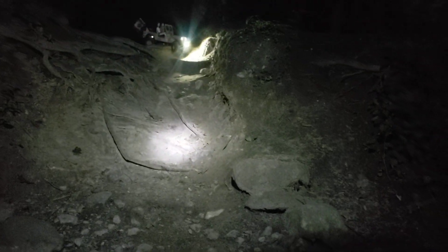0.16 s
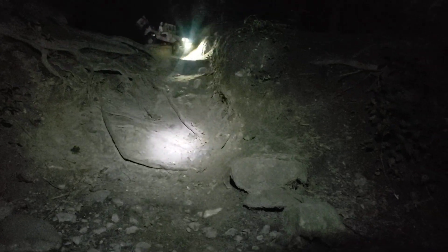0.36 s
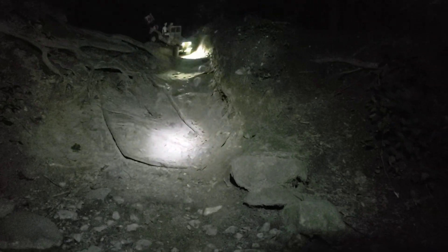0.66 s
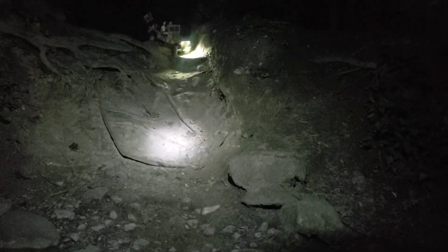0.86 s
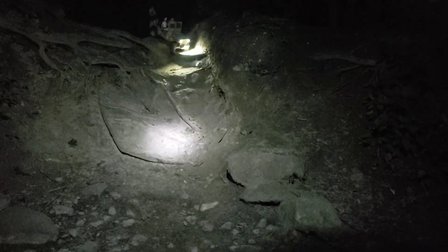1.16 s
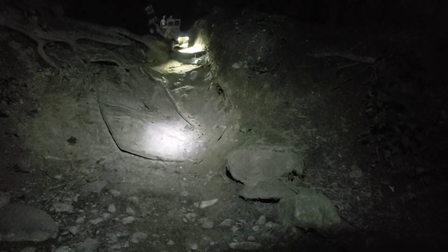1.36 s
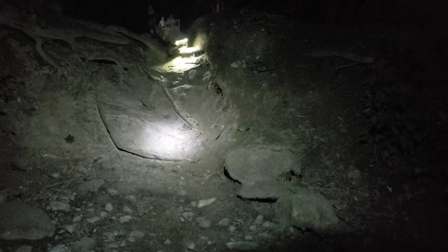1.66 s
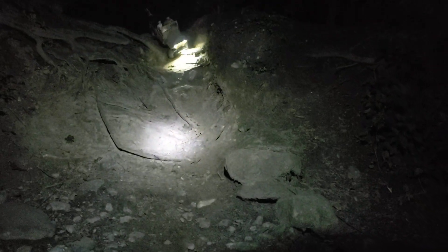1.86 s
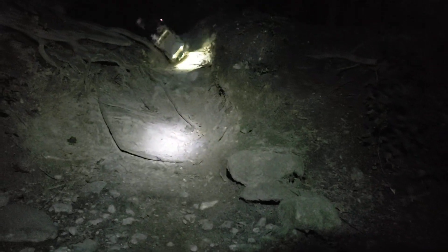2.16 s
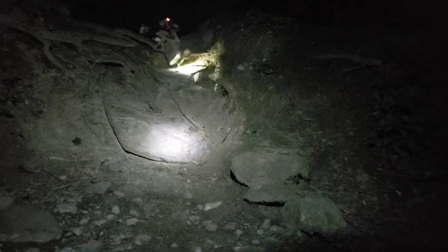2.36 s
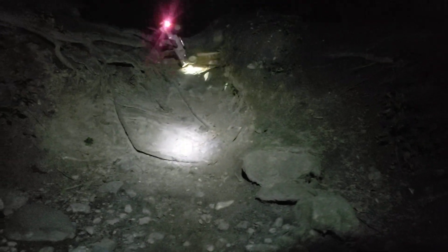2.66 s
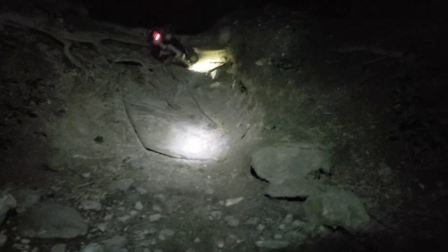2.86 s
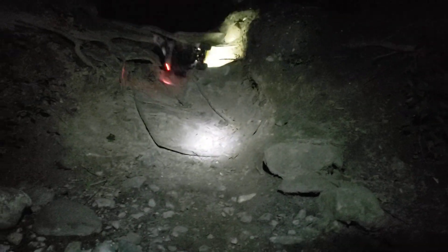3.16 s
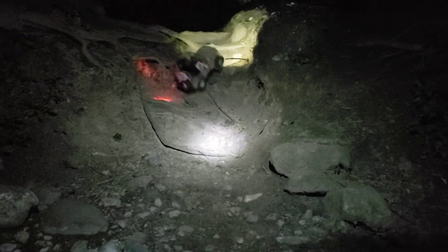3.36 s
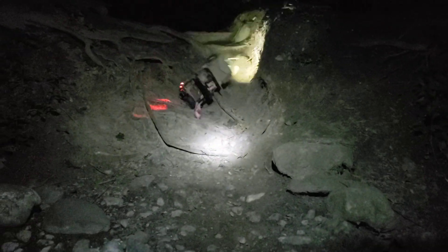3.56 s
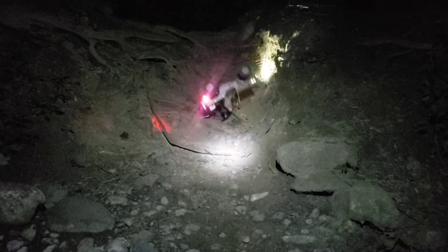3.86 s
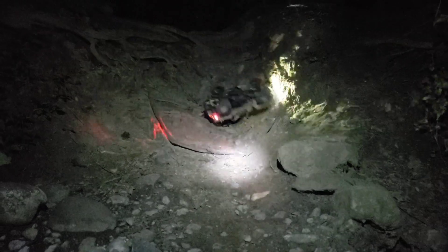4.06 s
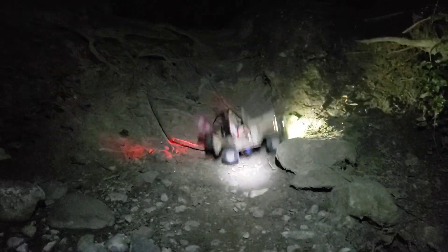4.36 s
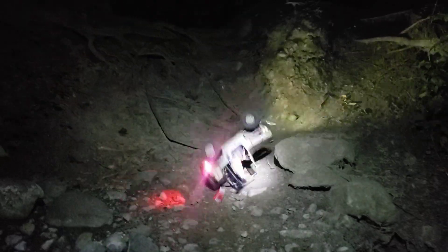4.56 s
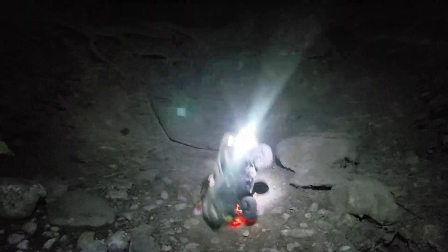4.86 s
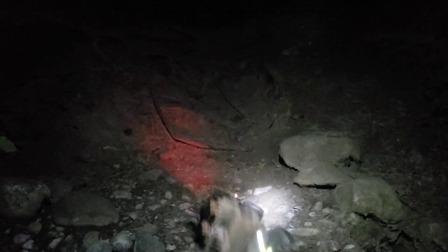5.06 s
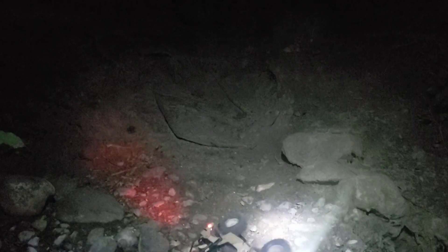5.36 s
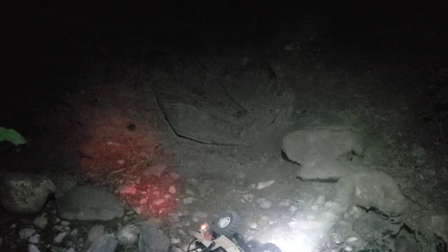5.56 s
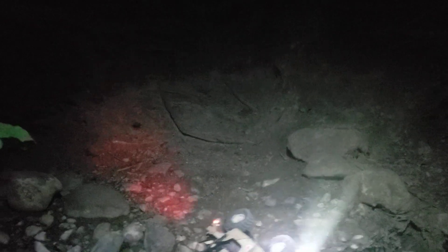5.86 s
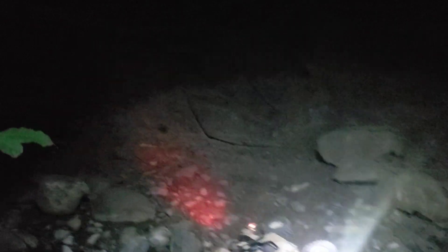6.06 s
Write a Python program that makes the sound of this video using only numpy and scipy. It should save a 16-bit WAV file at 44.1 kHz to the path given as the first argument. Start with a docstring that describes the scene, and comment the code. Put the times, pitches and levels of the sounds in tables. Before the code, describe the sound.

Nylon sleeve swishes over faint insects, then a small hard-shelled model vehicle tumbles down stone with hollow clacks, rubbery thumps and gritty scrapes.

```python
"""A radio-controlled model truck slips on a rock face and tumbles onto gravel near the microphone, at night in a wood.
Damped resonances make its tyres thump and its plastic shell knock and rattle; gliding tones make it judder.
Each slide drags grit along: showers of tiny noise bursts under levels that bite, fade and let go.
Before the fall a nylon sleeve swishes close by, as thread noise and whistles that follow the speed of each stroke.
Behind it all, narrow bands of pulsing noise trill as insects over a low, distant rumble."""
import sys
import numpy as np
from scipy import signal
from scipy.fft import rfft, irfft, next_fast_len
from scipy.io import wavfile

SR = 44100
rng = np.random.default_rng(int(sys.argv[2]) if len(sys.argv) > 2 else 0)


def wav_record(signal):
    """Record a signal, one row per channel, as 16-bit PCM in the file named by sys.argv[1]."""
    frames = np.transpose(np.atleast_2d(signal))
    bounded = np.clip(frames, -1, 1)
    # unit amplitude maps onto the largest positive 16-bit level
    quanta = np.round(bounded * 32767).astype(np.int16)
    wavfile.write(sys.argv[1], SR, quanta)


N = 274301  # length of the scene in samples

# Distant rumble of the night. Each row: frequency in Hz, density in dB per Hz.
NIGHT_SPECTRUM = [(20, -26), (40, -14), (60, -2), (80, -0.5), (118, -2), (160, -12), (250, -18.5),
                  (400, -33.5), (800, -41.5), (1600, -50), (3800, -55), (8500, -61.5), (12000, -56.5),
                  (16000, -57)]
NIGHT_DB = -48.5  # before its slow wander
# Insect choruses. Each row: centre in Hz, width in Hz, level in dB, mean pulse rate per second.
INSECTS = [(2370, 270, -80.5, 33), (4550, 180, -86, 47), (5080, 630, -74.5, 59)]

# Strokes of nylon on nylon. Each row: middle in seconds, half length in seconds, top rate of threads in Hz,
# hiss in dB, hollow rustle in dB, treble in dB.
STROKES = [(0.144, 0.076, 6470, -51.5, -51.5, -49.5), (0.461, 0.074, 4870, -53, -53.5, -52),
           (1.051, 0.054, 3490, -65.5, -55, -63), (1.467, 0.043, 3500, -77, -63.5, -82),
           (1.735, 0.033, 3410, -65.5, -57, -72), (1.827, 0.062, 2200, -74, -61, -98)]
# Hiss of the threads, hollow rustle and treble sheen. Each row: frequency in Hz, density in dB per Hz.
NYLON_SPECTRUM = [(900, -3), (1500, -6), (2500, -1.5), (3200, -0.5), (4000, -4.5), (5500, -5), (6800, -4),
                  (9000, -19)]
HOLLOW_SPECTRUM = [(100, -32), (230, 10), (450, -14), (720, 3.5), (870, -5), (1100, -20), (2000, -32)]
SHEEN_SPECTRUM = [(4500, -34), (7500, -3.5), (11000, 0), (13000, -1), (14400, 2), (16000, -8)]
# Resonances of the folds of cloth. Each row: frequency in Hz, width in Hz, gain in dB.
FOLD_MODES = [(3260, 290, 7.5), (4800, 440, 0.5), (6800, 360, 4.5), (11200, 600, -4), (14400, 530, -5)]

# Skids of the truck over grit. Each row: start in seconds, length in seconds, scrape in dB,
# tyre rumble in dB, fine sand in dB.
SKIDS = [(2.244, 0.14, -46.5, -49, -57.5), (2.552, 0.13, -49.5, -52.5, -57.5),
         (2.981, 0.076, -42, -45, -47.5), (3.1, 0.09, -48, -52, -48.5), (3.218, 0.1, -41, -44.5, -56),
         (3.314, 0.14, -41, -47, -46.5), (3.466, 0.068, -50.5, -53, -67), (3.564, 0.067, -40, -44.5, -45),
         (3.65, 0.1, -51, -49.5, -58.5), (3.796, 0.22, -38.5, -40, -44.5), (4.012, 0.15, -42.5, -59.5, -49),
         (4.246, 0.056, -33, -42.5, -41.5), (4.334, 0.043, -33.5, -39, -39),
         (4.487, 0.25, -40, -47.5, -45.5), (4.783, 0.1, -38.5, -44.5, -51), (5.013, 0.16, -48, -58.5, -55),
         (5.158, 0.08, -40.5, -42.5, -46), (5.208, 0.087, -36.5, -48, -42),
         (5.319, 0.068, -32.5, -38, -38.5), (5.404, .10, -40, -44, -46.5),
         (5.533, 0.042, -57, -49.5, -55.5), (5.784, 0.053, -47, -51.5, -54.5),
         (5.914, 0.2, -58, -51.5, -60), (6.11, .07, -48, -52.5, -56)]
# A skid bites at once, fades as friction slows the truck, and lets go.
BITE_S, SLOWING_DB_PER_S, RELEASE_S = 0.005, 25.5, 0.022
# Grit that was kicked loose trickles on after it.
TRICKLE_DB, TRICKLE_S = -6, 0.09
# Coarse scrape, drumming tyres and bright stone or sand. Each row: frequency in Hz, density in dB per Hz.
SCRAPE_SPECTRUM = [(250, -15), (480, -20), (620, 0), (760, 4.5), (1100, -5.5), (1500, -2), (2200, -3.5),
                   (2900, -20), (4200, -36.5)]
RUMBLE_SPECTRUM = [(50, -19.5), (120, -6), (230, 1), (320, -3), (450, -22.5), (800, -38)]
STONE_SPECTRUM = [(1500, -0.5), (2900, -1.5), (5000, -3), (6600, -5), (8300, -14.5), (10000, -14),
                  (11000, -13), (12400, -6.5), (14000, -15.5), (16000, -18)]

# Small hard parts on pebbles. Each row: start in seconds, decay of the exciting noise in seconds,
# pitch in Hz, width in Hz, level in dB.
CLINKS = [(5.154, .007, 15200, 890, -49), (5.427, 0.0018, 13300, 3440, -31)]
# Plastic and rubber juddering on stone. Each row: start in seconds, length in seconds, start pitch in Hz,
# end pitch in Hz, level in dB.
JUDDERS = [(3.230, 0.056, 819, 775, -35.5), (4.096, 0.019, 1610, 1550, -37), (4.251, 0.022, 855, 808, -31),
           (4.370, 0.0163, 1406, 1474, -28), (5.022, 0.01, 1380, 1220, -39), (5.423, 0.015, 774, 756, -32),
           (5.800, 0.028, 556, 520, -44.5), (5.930, 0.14, 1540, 1460, -66)]

# Tyre landings. Each row: start in seconds, thump in dB.
LANDINGS = [(2.258, -42.5), (2.595, -41.5), (2.985, -40), (3.006, -43), (3.133, -42.5), (3.23, -35),
            (3.242, -40.5), (3.327, -38.5), (3.402, -34.5), (3.585, -36.5), (3.803, -28.5), (3.816, -34),
            (4.281, -37.5), (4.341, -26), (4.666, -32), (5.330, -27)]
# Tyre resonances at a middling landing. Each row: frequency in Hz, width in Hz, gain in dB.
TYRE_MODES = [(158.4, 67, -4), (236.2, 31.7, 6.5), (300, 48.5, 3.5)]
# Rubber stiffens when squashed: above a middling landing its pitch rises.
MIDDLING_DB, STIFFEN_OCTAVES_PER_DB = -32.5, 0.03

# Blows of the shell on rock. Each row: start in seconds, knock in dB, crack in dB,
# centre of the knock in Hz, contact time in seconds.
KNOCKS = [(2.258, -49, -51, 784, 0.0089), (2.499, -67, -59.5, 1860, 0.025),
          (2.572, -51.5, -65, 1040, .0033), (3.006, -46, -59, 930, 0.018), (3.104, -48.5, -53, 1110, .003),
          (3.133, -40, -38, 1680, 0.0045), (3.229, -40.5, -68, 750, 0.0032),
          (3.243, -39.5, -53.5, 805, 0.036), (3.324, -46.5, -55, 840, .005),
          (3.366, -38.5, -49.5, 800, .011), (3.403, -43, -51, 796, 0.024), (3.586, -37, -43.5, 1070, 0.034),
          (3.802, -29, -37, 1360, .0056), (3.815, -36, -39.5, 1500, 0.01), (3.868, -45, -45, 1550, 0.013),
          (4.058, -50, -53, 1850, .004), (4.146, -48, -48, 2100, .004), (4.235, -45, -45, 930, 0.009),
          (4.251, -53, -41.5, 820, 0.0016), (4.281, -42, -43, 845, 0.006),
          (4.370, -37.5, -49, 1320, 0.0092), (4.378, -32.5, -38, 1420, 0.0067),
          (4.506, -40.5, -46, 1080, 0.0043), (4.608, -37.5, -49, 840, 0.0026),
          (4.671, -35, -47.5, 1470, 0.0084), (4.797, -34.5, -36.5, 1570, 0.0028),
          (4.818, -61, -40.5, 1330, 0.009), (4.847, -42.5, -42, 1140, 0.0018),
          (5.009, -49, -54.5, 1330, 0.0046), (5.040, -28.5, -39.5, 1090, 0.0064),
          (5.105, -55, -53, 1300, .0027), (5.214, -37.5, -51, 920, 0.0034),
          (5.228, -30.5, -42.5, 790, 0.0085), (5.259, -41, -38, 910, 0.0034),
          (5.331, -33.5, -39, 1160, 0.01), (5.417, -32.5, -37.5, 1020, 0.0083),
          (5.425, -34, -30.5, 815, 0.012), (5.802, -41, -56, 1100, .025),
          (5.932, -51.5, -55.5, 1490, 0.014), (6.152, -45, -68, 890, .006)]
# Shell resonances before each blow favours some. Each row: frequency in Hz, width in Hz, gain in dB.
SHELL_MODES = [(555, 25.5, -10), (787, 108, -3), (968, 150, -6.5), (1240, 130, -7), (1498, 99, -3.5),
               (1995, 105, -7), (2168, 71, -1.5), (2710, 204, -7.5)]

# Width between the two microphone ports. Each row: frequency in Hz, side gain in dB.
SPREAD = [(100, -20), (250, -13), (700, -10.5), (1300, -7.5), (2400, -4.5), (4400, -1.5), (8000, 0.5),
          (15000, 0)]
# Balance of the two ports. Each row: frequency in Hz, left minus right gain in dB.
LEAN = [(250, 0.5), (700, 3), (1300, 1.5), (2400, 3.5), (4400, 5.5), (8000, 0), (15000, 0)]
TOP_HZ = 16100  # upper edge of the recorder


def amp(db):
    """Decibels to gain."""
    return 10 ** (np.asarray(db) / 20)


def unit(x):
    """Scale to an rms of one."""
    return x / np.sqrt(np.mean(x ** 2) + 1e-20)


def burst(x):
    """Scale each row of a short sound to the energy of 20 ms at an rms of one."""
    energy = np.sum(x ** 2, axis=1, keepdims=True)
    return x / np.sqrt(energy / (0.02 * SR))


def noise(size):
    """Two unrelated noises: mid, which the ports share, and side, which differs between them."""
    return rng.standard_normal((2, size))


def filtered(x, response):
    """Apply a response given as a function of frequency."""
    size = next_fast_len(x.shape[-1] + 2048)
    hz = np.maximum(np.arange(size // 2 + 1) * SR / size, 1)
    return irfft(rfft(x, size) * response(hz), size)[..., :x.shape[-1]]


def colour(x, spectrum):
    """Shape by (Hz, dB) points, joined along a logarithmic frequency axis."""
    points, db = np.transpose(spectrum)
    return filtered(x, lambda hz: amp(np.interp(np.log(hz), np.log(points), db)))


def ring(x, modes):
    """Pass through damped resonances of alternating sign."""
    def response(hz):
        total = 0
        for k, (f, width, db) in enumerate(modes):
            detuning = (hz / f - f / hz) * f / width
            total = total + (-1) ** k * amp(db) / (1 + 1j * detuning)
        return total
    return filtered(x, response)


def walk(rate, size=N):
    """Random wander with a spread near one, in straight lines between `rate` new values per second."""
    t = np.arange(size) / SR * rate
    count = int(t[-1]) + 2
    return 1.2 * np.interp(t, np.arange(count), rng.standard_normal(count))


def grains(rate, scatter_db, decay_s, size=N):
    """Randomly timed tiny contacts of uneven strength, each a quickly dying burst."""
    strength = amp(scatter_db * np.minimum(rng.exponential(size=size), 4))
    energy = (rng.random(size) < rate / SR) * strength ** 2
    ringing_energy = signal.lfilter([1], [1, -np.exp(-2 / (decay_s * SR))], energy)
    return noise(size) * np.sqrt(ringing_energy)


def add(out, s, x):
    """Mix a short sound in at time s."""
    i = max(int(s * SR), 0)
    out[:, i:i + x.shape[1]] += x[:, :N - i]


def night():
    """A low distant rumble and many far insects blending into narrow trilling bands."""
    out = amp(NIGHT_DB) * unit(colour(noise(N), NIGHT_SPECTRUM)) * amp(0.82 * walk(7.5))
    for hz, width, db, rate in INSECTS:
        chorus = filtered(noise(N), lambda f: 1 / (1 + np.abs(2 * (f - hz) / width) ** 1.66))
        wavering_rate = rate * (1 + 0.11 * walk(2.2))
        pulse = 1 + 0.07 * np.sin(2 * np.pi * np.cumsum(wavering_rate) / SR)
        out = out + amp(db + 0.27 * walk(1.75)) * unit(chorus * pulse)
    return out


def trees(x, t60_s=0.42, wet_db=-19):
    """Trunks and the bank scatter a weak tail, strongest around 4 kHz."""
    t = np.arange(SR // 2) / SR
    scatter = colour(noise(len(t)), [(100, 3.5), (800, -3.0), (4000, 16.5), (15000, -10)])
    tail = scatter * amp(-60 * t / t60_s) * (1 - np.exp(-t / 0.0018))
    tail = tail / np.sqrt(np.sum(tail ** 2) / 2)
    return x + amp(wet_db) * signal.fftconvolve(x, tail, axes=1)[:, :N]


def thread_noise(spectrum):
    """A dense shower of tiny thread slips, coloured by the cloth."""
    return unit(colour(grains(rate=7000, scatter_db=5.5, decay_s=0.0048), spectrum))


def sleeve(whistle_db=-2, jitter=0.0498, snag=0.09):
    """Threads slip in a hiss that swells and brightens with speed; the weave whistles through the folds."""
    t, out, weave = np.arange(N) / SR, 0, 0
    hiss, hollow, sheen = (thread_noise(c) for c in (NYLON_SPECTRUM, HOLLOW_SPECTRUM, SHEEN_SPECTRUM))
    for s, half_s, top_hz, hiss_db, hollow_db, treble_db in STROKES:
        speed = 1 / (1 + np.abs((t - s) / half_s) ** 3)  # 1 at the middle of the stroke
        out = out + amp(hiss_db) * speed ** 0.98 * hiss
        out = out + amp(hollow_db) * speed ** 1.17 * hollow
        out = out + amp(treble_db) * speed ** 1.17 * sheen
        # threads crossed at different angles give several whistles that rise and fall together,
        # each snagging on its own
        for ratio, db in [(0.72, -14), (1, 0.5), (1.68, -13.5), (2.13, -9)]:
            unevenness = 1 + jitter * walk(2500) + snag * walk(45)
            phase = 2 * np.pi * np.cumsum(ratio * top_hz * speed * unevenness) / SR
            weave = weave + amp(hiss_db + whistle_db + db) * speed ** 0.11 * np.exp(1j * phase)
    whistles = np.array([weave.real, weave.imag]) * (1 + 0.5 * walk(600))
    return out + ring(whistles, FOLD_MODES)


def pebbles(rate=400, scatter_db=5.0, low_hz=650, high_hz=7000, cycles=7, tilt_db=-4.0):
    """Small stones click together, each with a sharp start and a short ring at its own pitch."""
    out, t = np.zeros((2, N)), np.arange(SR // 30) / SR
    for when, size, force, angle in rng.random((int(rate * N / SR), 4)):
        hz = low_hz * (high_hz / low_hz) ** size
        # tilt_db is per octave: higher clicks are softer
        db = scatter_db * min(-np.log(1 - force), 3) + tilt_db * np.log2(hz / low_hz)
        click = np.sin(2 * np.pi * hz * t) * np.exp(-t * hz / cycles)
        mid_side = [1, np.sqrt(2) * np.cos(2 * np.pi * angle)]
        add(out, when * N / SR, amp(db) * np.outer(mid_side, click))
    return unit(out)


def skid_levels():
    """Scrape, rumble and sand gains: every skid bites, slows, lets go and leaves a trickle."""
    power, t = np.zeros((3, N)), np.arange(SR) / SR
    for s, length, *db in SKIDS:
        after = np.maximum(t - length, 0)
        grip = (1 - np.exp(-t / BITE_S)) * amp(-SLOWING_DB_PER_S * t)
        trickle = amp(TRICKLE_DB) * np.exp(-after / TRICKLE_S)
        letting_go = np.maximum(np.exp(-after / RELEASE_S), trickle)
        add(power, s, np.outer(amp(db), grip * letting_go) ** 2)
    return np.sqrt(power)


def slide():
    """Coarse grit grinds under the truck, pebbles click, the tyres drum, and fine sand crackles."""
    scrape, rumble, sand = skid_levels()
    coarse = unit(colour(grains(rate=900, scatter_db=3.0, decay_s=0.002), SCRAPE_SPECTRUM))
    drum = unit(colour(grains(rate=240, scatter_db=0.5, decay_s=0.011), RUMBLE_SPECTRUM))
    fine = unit(colour(grains(rate=900, scatter_db=4, decay_s=0.0022), STONE_SPECTRUM))
    grit = amp(-4.5) * coarse + amp(-4.0) * pebbles()
    return scrape * grit + rumble * drum + sand * fine


def clinks():
    """Brief, very high rings of hard parts on pebbles: dying noise through one resonance."""
    out, t = np.zeros((2, N)), np.arange(SR // 10) / SR
    for s, decay_s, hz, width, db in CLINKS:
        strike = noise(len(t)) * np.exp(-t / decay_s)
        add(out, s, amp(db) * burst(ring(strike, [(hz, width, 0)])))
    return out


def judders(jitter=0.084, overtone_db=-16.0, grit=0.47):
    """Short runs of stick and slip: a gliding tone whose rate and strength waver."""
    out = np.zeros((2, N))
    for s, length, start_hz, end_hz, db in JUDDERS:
        size = int(length * SR)
        hz = np.linspace(start_hz, end_hz, size) * (1 + jitter * walk(906, size))
        phase = 2 * np.pi * np.cumsum(hz) / SR + rng.uniform(0, 2 * np.pi, (2, 1))
        tone = np.sin(phase) + amp(overtone_db) * np.sin(2 * phase)
        tone = tone * (1 + grit * walk(510, size))
        add(out, s, amp(db) * unit(tone * signal.windows.tukey(size, 0.2)))
    return out


def landings(push_s=0.0015, pitch_scatter=0.095):
    """Rubber gives a soft push, in mid only; a harder landing tends to ring the tyre higher."""
    out, t = np.zeros((2, N)), np.arange(SR // 5) / SR
    push = np.array([t * np.exp(-t / push_s)])
    for s, thump_db in LANDINGS:
        octaves = STIFFEN_OCTAVES_PER_DB * (thump_db - MIDDLING_DB) + pitch_scatter * rng.standard_normal()
        modes = [(f * 2 ** octaves, width, db) for f, width, db in TYRE_MODES]
        add(out, s, amp(thump_db) * burst(ring(push, modes)) * [[1], [0]])
    return out


def contact(contact_s, size, rattle_db=-17, rattle_stretch=3, snap_db=-4):
    """A sharp first touch, and a chatter that dies away into a weaker rattle of loose parts."""
    t = np.arange(size) / SR
    rattle = amp(rattle_db) * np.exp(-t / (rattle_stretch * contact_s))
    envelope = np.exp(-(t / contact_s) ** 2) + rattle
    chatter = burst(envelope * grains(rate=6000, scatter_db=2.2, decay_s=0.0004, size=size))
    snap = burst(noise(size) * np.exp(-t / 0.00056))
    return chatter + amp(snap_db) * snap


def knocks(focus_db=9.5, mode_scatter_db=1.5, stone_db=-3):
    """Each blow clatters the shell's resonances and cracks on stone; loose parts rattle on."""
    out, size = np.zeros((2, N)), 8192
    for s, knock_db, crack_db, hz, contact_s in KNOCKS:
        # the place that is struck favours the shell modes near one pitch; focus_db is lost per octave away
        modes = []
        for f, width, db in SHELL_MODES:
            favour_db = -focus_db * abs(np.log2(f / hz)) + mode_scatter_db * rng.standard_normal()
            modes.append((f, width, db + favour_db))
        knock = burst(ring(contact(contact_s, size), modes))
        # every stone rings briefly at pitches of its own
        touch = contact(contact_s, size)
        stone_modes = [(f, 160, 0) for f in rng.uniform(2790, 6910, size=5)]
        stone_ring = burst(ring(touch, stone_modes))
        crack = burst(burst(colour(touch, STONE_SPECTRUM)) + amp(stone_db) * stone_ring)
        add(out, s, amp(knock_db) * knock + amp(crack_db) * crack)
    return out


def scene():
    """All sources reach two close ports: alike in the bass, wide in the treble, a little to the left."""
    truck = slide() + landings() + knocks() + clinks() + judders()
    mid, side = trees(truck + sleeve()) + night()
    side = colour(side, SPREAD)
    left = colour(mid + side, [(hz, db / 2) for hz, db in LEAN])
    right = colour(mid - side, [(hz, -db / 2) for hz, db in LEAN])
    return np.array([left, right])


def record(dry):
    """The recorder cuts the top steeply."""
    return signal.sosfilt(signal.ellip(10, 0.2, 70, TOP_HZ, fs=SR, output="sos"), dry)


dry = scene()
out = record(dry)
wav_record(out)
```